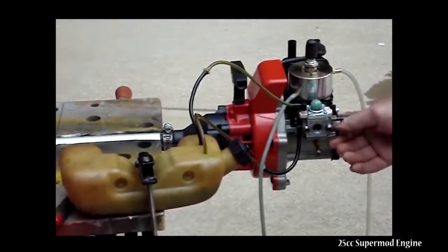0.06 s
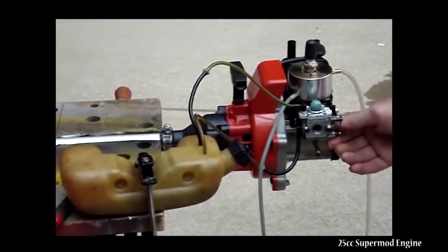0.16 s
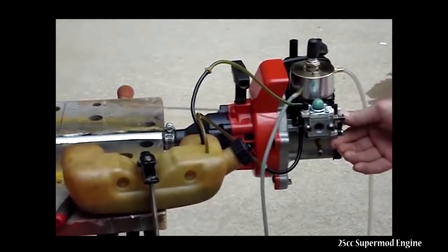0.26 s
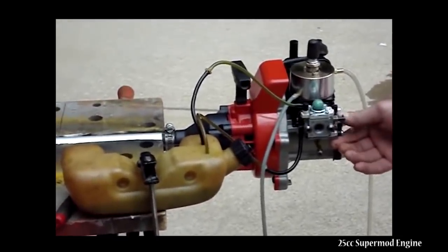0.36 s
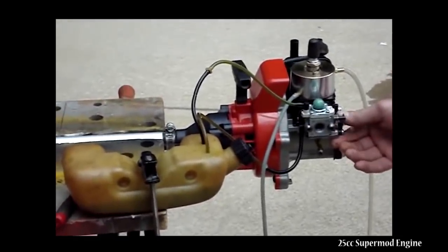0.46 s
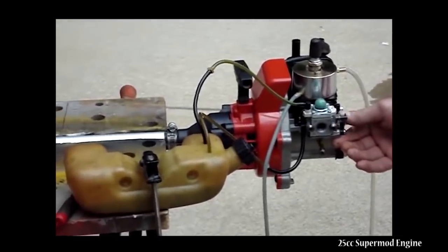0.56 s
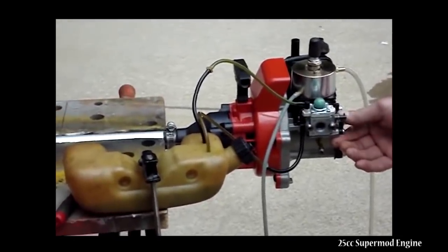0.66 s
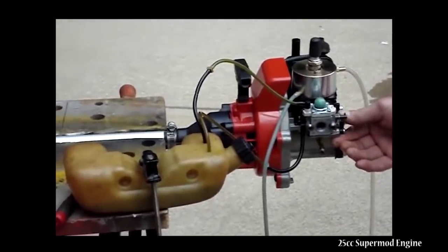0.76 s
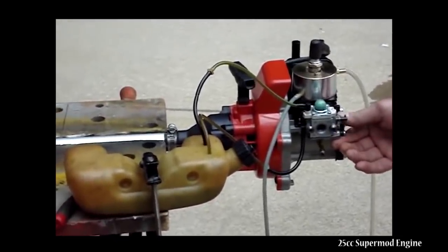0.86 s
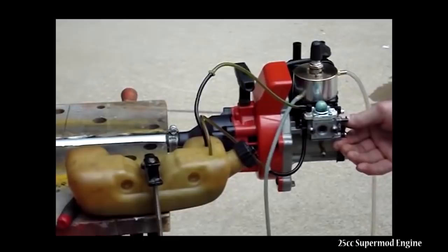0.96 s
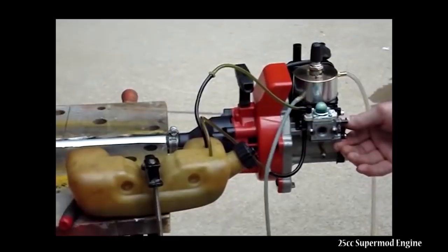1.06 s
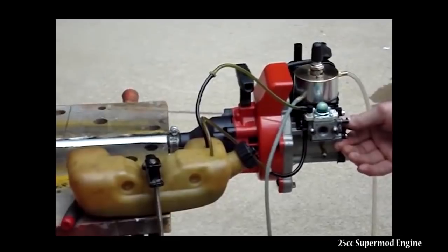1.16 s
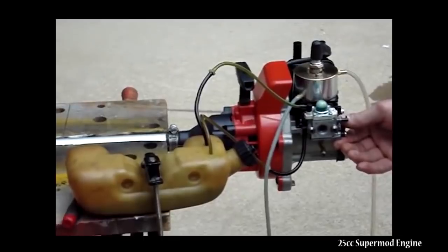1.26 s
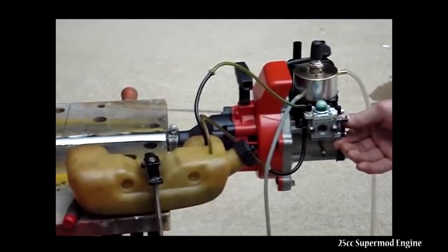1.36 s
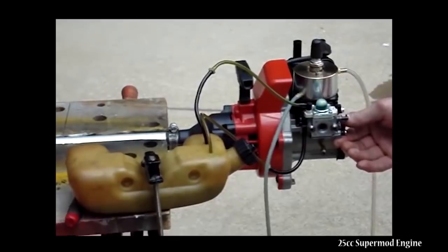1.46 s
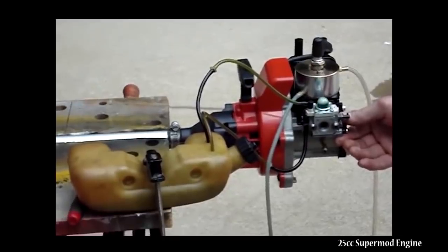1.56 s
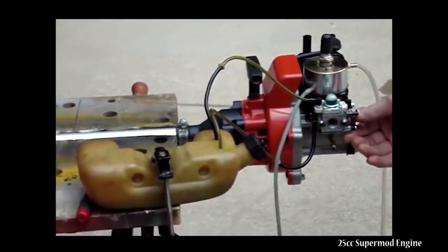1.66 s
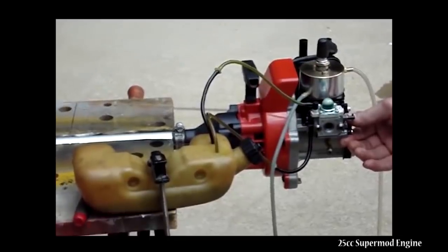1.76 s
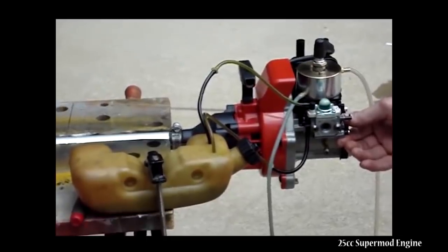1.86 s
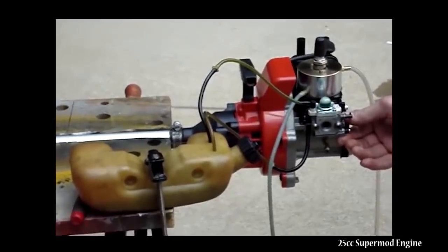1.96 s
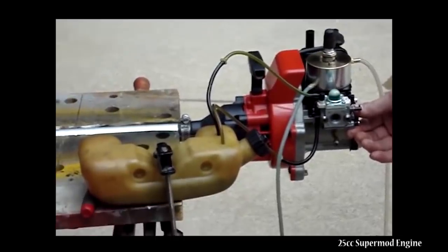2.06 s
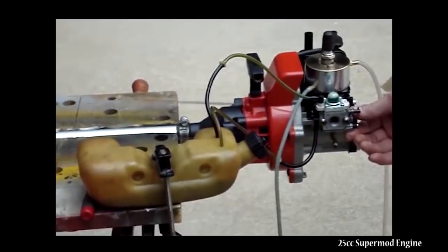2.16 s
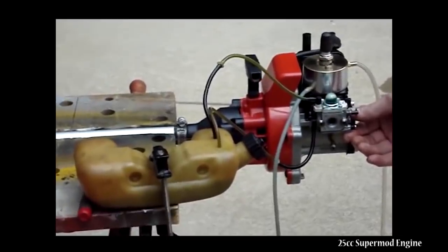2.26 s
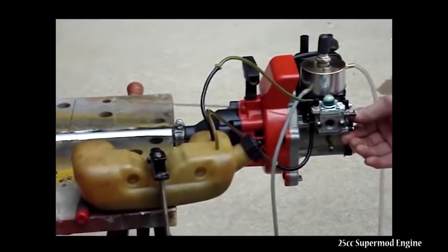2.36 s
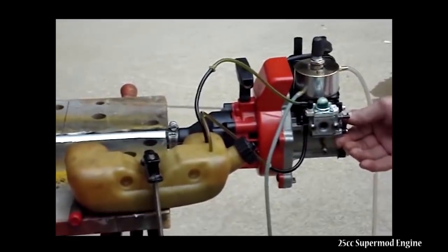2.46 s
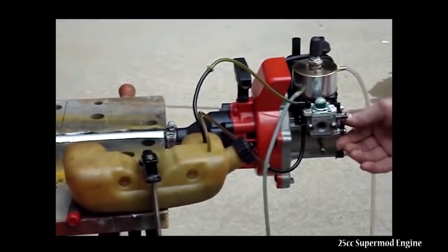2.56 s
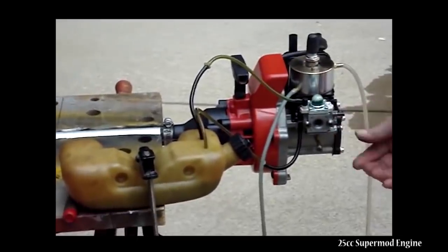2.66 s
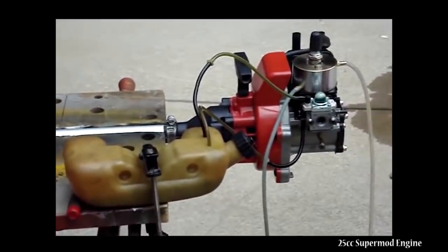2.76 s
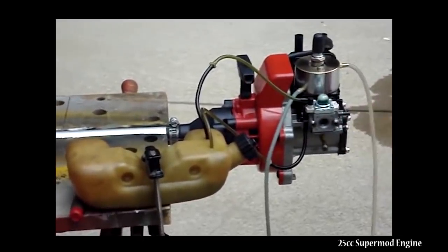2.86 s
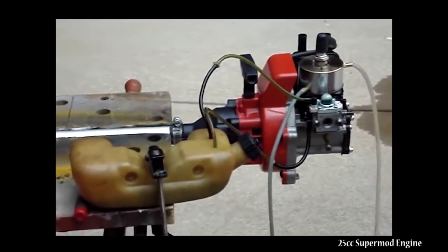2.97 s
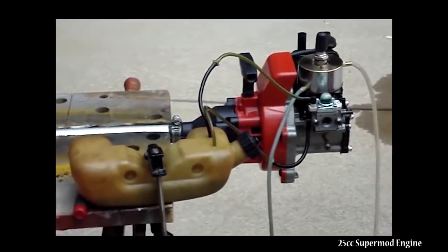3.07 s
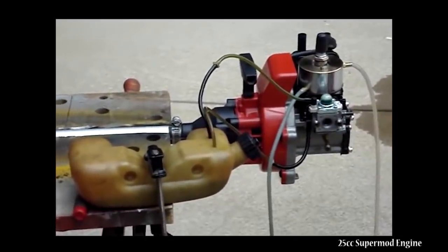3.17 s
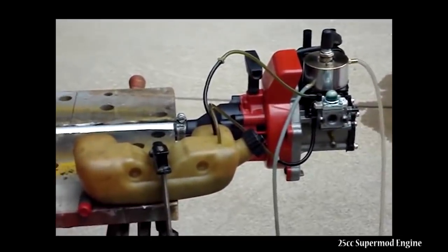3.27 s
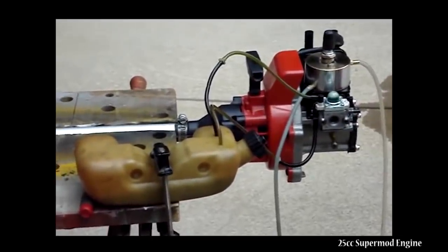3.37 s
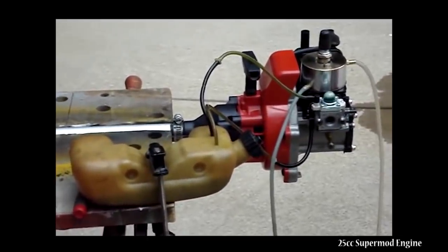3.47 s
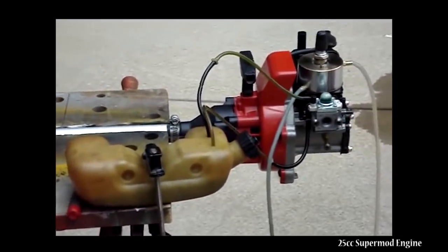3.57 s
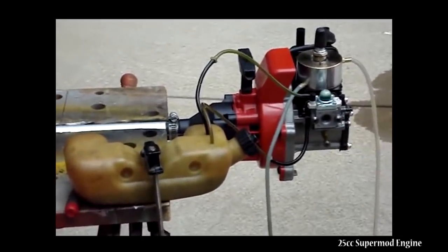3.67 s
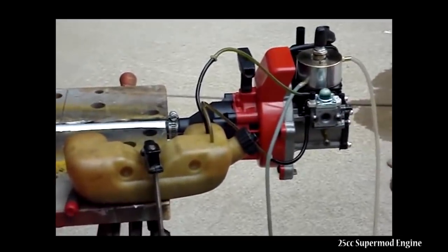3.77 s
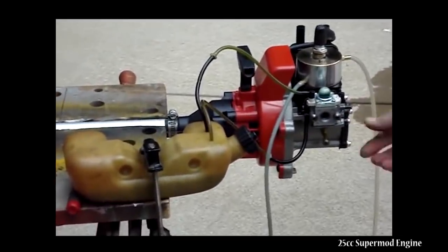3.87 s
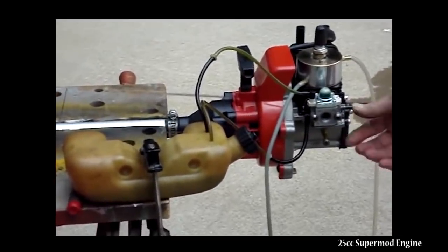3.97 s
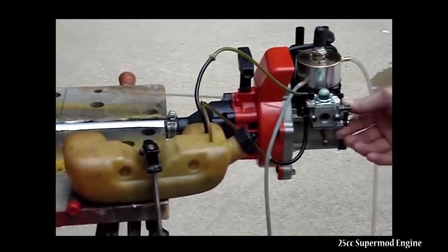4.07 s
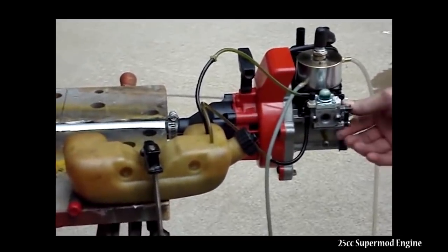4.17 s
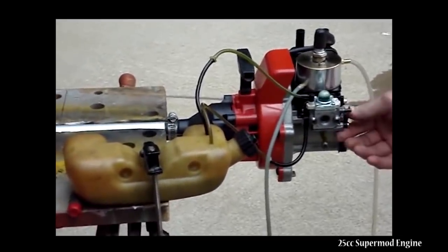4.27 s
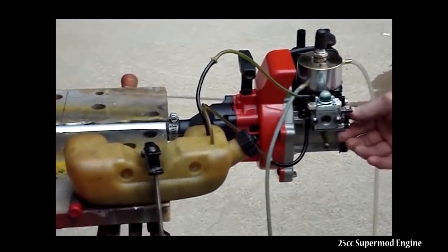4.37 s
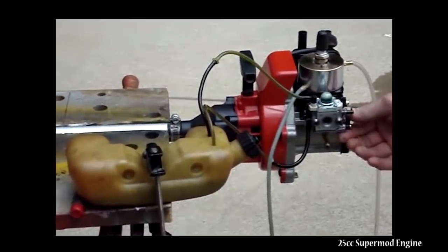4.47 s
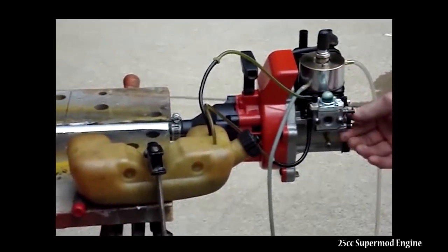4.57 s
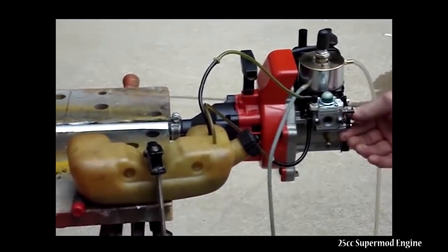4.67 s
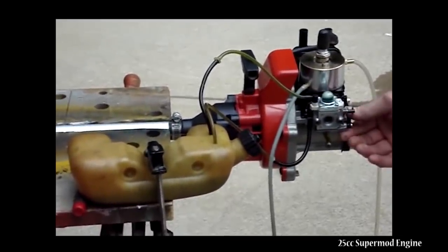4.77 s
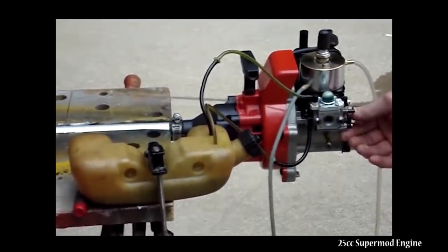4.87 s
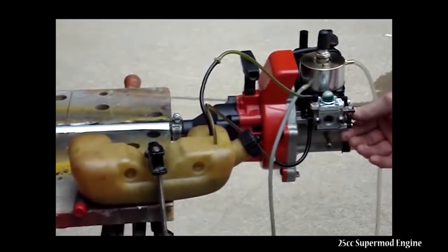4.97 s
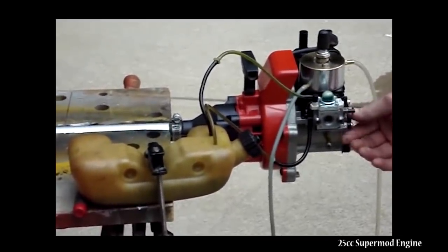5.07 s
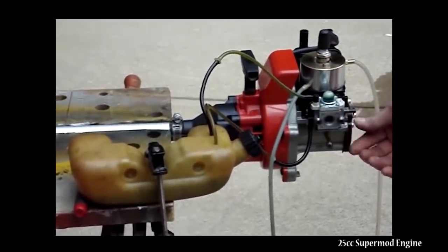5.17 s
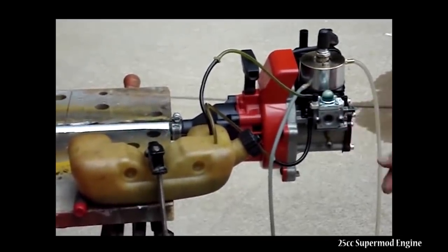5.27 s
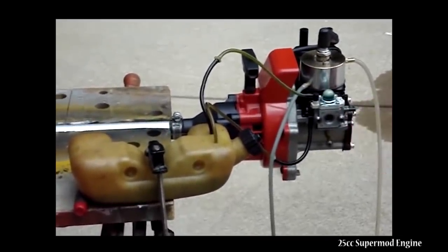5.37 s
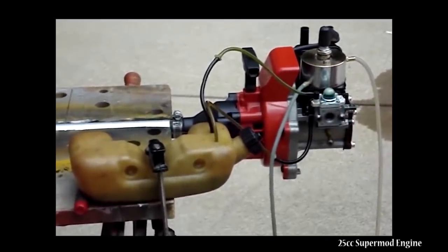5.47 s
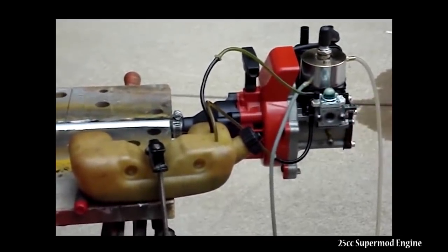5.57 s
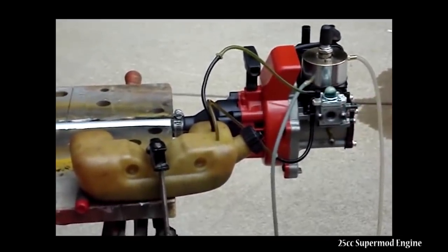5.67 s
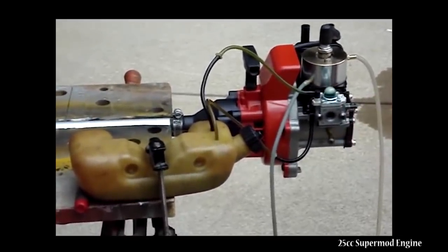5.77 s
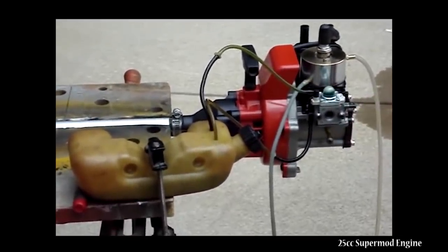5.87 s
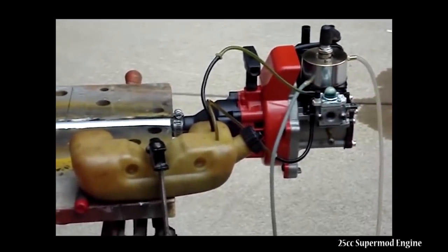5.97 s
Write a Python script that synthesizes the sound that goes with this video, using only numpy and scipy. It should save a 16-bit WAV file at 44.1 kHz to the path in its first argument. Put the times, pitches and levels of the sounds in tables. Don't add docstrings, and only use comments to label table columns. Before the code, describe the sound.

Screaming little petrol engine snaps shut, coasts down through singing whines and buzzes, then idles with sharp irregular cracks and metallic rattling.

```python
import sys
import numpy as np
from scipy import signal
from scipy.io import wavfile
from scipy.ndimage import uniform_filter1d

SR = 44100
rng = np.random.default_rng(int(sys.argv[2]) if len(sys.argv) > 2 else 0)


def boost(x):
    u = np.asarray(x, float) / 20
    return 10 ** u


def materialize(psi):
    bounded = np.clip(np.atleast_2d(psi).T, -1, 1)
    quanta = np.round(bounded * 32767).astype(np.int16)
    wavfile.write(sys.argv[1], SR, quanta)


N = 265923
BASS_HZ = 170
SKIP_FROM_S, SKIP_UNTIL_S = .1357, .2961


def ring(x, modes):
    total = 0
    for k, (hz, width_hz, db) in enumerate(modes):
        b, a = signal.iirpeak(hz, hz / width_hz, fs=SR)
        total = total + (-1) ** k * boost(db) * signal.lfilter(b, a, x)
    return total


def clicks(at, size):
    whole = np.clip(at, 0, N - 2).astype(int)
    part = at - whole
    return np.bincount(whole, size * (1 - part), N) + np.bincount(whole + 1, size * part, N)


def held(x, db, span_s=0.11):
    return x * boost(db) / np.sqrt(uniform_filter1d(x ** 2, int(span_s * SR)) + 1e-12)


def struck(at, db, modes, burst_s, rough):
    push = np.exp(-np.arange(int(8 * burst_s * SR)) / (burst_s * SR))
    grain = 1 - rough + rough * rng.standard_normal(N)
    trials = push * grain[:12 * len(push)].reshape(12, -1)
    typical = np.abs(ring(np.pad(trials, ((0, 0), (0, 400))), modes)).max(axis=1).mean()
    blows = signal.fftconvolve(clicks(at, boost(db)), push)[:N]
    return ring(blows * grain, modes) / typical


# (time_s, turns_per_s)
SPEED = [(0, 180), (.13, 210.9), (.2, 218), (.28, 221.1), (.33, 217.4), (.5, 195.5), (.9, 146.4),
         (1.1, 121.6), (1.3, 103.5), (1.5, 87.7), (1.7, 75.4), (1.9, 62.5), (2.45, 51), (3.0, 37),
         (3.9, 32), (4.6, 36), (5.1, 54), (6.03, 47)]


def speed(size=N):
    return np.interp(np.arange(size) / SR, *np.transpose(SPEED))


def crank():
    turns = np.cumsum(speed()) / SR
    marks = (SR * np.array([SKIP_FROM_S, SKIP_UNTIL_S] + [row[0] for row in FIRINGS])).astype(int)
    whole = np.cumsum(np.round(np.diff(turns[marks], prepend=0)))
    return turns + np.interp(np.arange(N), marks, whole - turns[marks])


def slowness(turns):
    return np.clip(uniform_filter1d(35 / SR / np.gradient(turns), 2000), 0, 1)


def throttle(size=N):
    shut_s = .3
    return np.interp(np.arange(size) / SR, [shut_s - .01, shut_s + .03], [1, 0])


# (time_s, level_db)
LEVEL = [(0, -36.5), (0.119, -37.5), (.27, -42), (.5, -38), (.69, -35.5), (.86, -33), (1.01, -29),
         (1.29, -29), (1.529, -27.5), (1.71, -28), (2.1, -33.5), (2.5, -42.5), (3.73, -45.5), (4.2, -42.5),
         (4.52, -44), (5.0, -40), (5.51, -44.5), (6.03, -44.5)]


def engine_db():
    return np.interp(np.arange(N) / SR, *np.transpose(LEVEL))


# (mode_hz, width_hz, level_db)
MUFFLER = [(214.6, 95, -1), (295.4, 44.2, 5.5), (351.7, 48.5, 2), (384.4, 35.4, 1), (514, 107, -18)]
# (mode_hz, width_hz, level_db)
INTAKE = [(529, 140, -4), (788, 123, 4.5), (1007, 212, 1), (1165, 95, 3.5), (1300, 170, -4)]


def pumping(turns, muffler_db, intake_db):
    hollow_hz, hollow_width_hz = 702, 66
    sigh_s = 0.0033
    count = np.arange(np.ceil(turns[0]), turns[-1])
    place = lambda angle: np.interp(angle, turns, np.arange(N))
    slow = slowness(turns)
    each = slow[place(count).astype(int)]
    chance = rng.standard_normal((len(count), 4)).T
    first = clicks(place(count - .03 + .01 * each * chance[0]), boost(1.4 * each * chance[1]))
    second_turn = count + .45 + 0.012 * each ** 2 * chance[3]
    second = clicks(place(second_turn), boost(1.6 * each * chance[2]))
    flutter = rng.standard_normal(N) * np.exp(-(turns % 1) / 5.8)
    push = np.hanning(int(sigh_s * SR))
    sigh = signal.fftconvolve(second, push / push.sum())[:N]
    breath = boost(-41 + 8 * slow ** 3) * flutter
    muffler = ring(first + boost(-8.5 + 9.6 * slow ** 4) * sigh + breath, MUFFLER)
    intake = ring(first + boost(-10) * second + boost(-37 + 25 * slow) * flutter, INTAKE)
    intake = signal.lfilter(*signal.iirnotch(hollow_hz, hollow_hz / hollow_width_hz, fs=SR), intake)
    merged_db = np.interp(slow, [.4, .6], [-13, 0])
    return held(muffler, muffler_db + merged_db) + held(intake, intake_db)


# (tone_hz, level_db)
TONE_COLOUR = [(100, -23), (150, -24), (200, -6.5), (250, -1.5), (310, 3.5), (420, -5.5), (560, -12.5),
               (1000, -35.5)]
ORDER_DB = [-6.5, -1, -7.5, -2, 3.5, -3, 4.5, 0.5, -12, -4.5, -8.5]
OPEN_ORDER_DB = [6.5, -1.5, 8, 24, -35, -19, -20, -9, -14, -7, -9]
ORDER_TILT_DB = [0, 0.5, 6.5, 3.5, 5, -2, -7.5, -4, -1, -0.5, -7]
MERGE_HZ = [34, 51.5, 68.2]
APART_DB = [-25.5, -16]


def tones(turns):
    wobble_turns = 0.03
    hz, colour_db = np.transpose(TONE_COLOUR)
    steps = np.repeat(rng.standard_normal((len(ORDER_DB), N // 900 + 1)), 900, axis=1)
    waver = uniform_filter1d(steps, 900)[:, :N]
    rate, opened = speed(), throttle()
    common_db = engine_db() + np.interp(rate, MERGE_HZ, APART_DB + [0])
    octaves = np.log2(rate / 90)
    turns = turns + wobble_turns * slowness(turns) * waver[-1]
    total = 0
    for k in range(len(ORDER_DB)):
        multiple = k + 1
        level_db = common_db + ORDER_DB[k] + ORDER_TILT_DB[k] * octaves + OPEN_ORDER_DB[k] * opened
        level_db = level_db + np.interp(np.log(multiple * rate), np.log(hz), colour_db) + 2.6 * waver[k]
        total = total + boost(level_db) * np.sqrt(2) * np.sin(2 * np.pi * multiple * turns + multiple ** 2)
    return total


# (mode_hz, width_hz, level_db)
BELL = [(980, 350, -12), (1110, 197, 18), (1330, 580, 11.5), (3495, 68, 12.5)]
# (mode_hz, width_hz, level_db)
WHISTLE = [(3480, 110, 0)]
# (mode_hz, width_hz, level_db)
THROAT = [(300, 53, -7.5), (1050, 830, -4), (2480, 1300, -41), (4600, 380, -2.5), (5540, 260, 8),
          (6200, 95, 8.5), (7170, 630, -0.5), (9830, 510, -3)]
SKIP_TURNS = [2] * 8 + [3] + [2] * 3 + [3, 3, 4]


def roar(turns):
    full_until_s, full_db, skip_db, rasp_db = .129, -14, -14, -25
    fired = np.round(turns[int(SKIP_FROM_S * SR)]) + np.cumsum([0] + SKIP_TURNS)
    sucks = np.interp(np.arange(np.ceil(turns[0]), fired[-1] + 1), turns, np.arange(N))
    full = sucks[sucks < full_until_s * SR]
    bellow_db = np.interp(sucks / SR, [0, .1, .26, .31], [-23.5, -21.5, -25.5, -32])
    bellow = struck(sucks, bellow_db, BELL, burst_s=.0001, rough=0.26)
    whistle = struck(full, np.full(len(full), -26.), WHISTLE, burst_s=.0001, rough=0.23)
    crack_db = np.r_[np.full(len(full), full_db), np.full(len(fired), skip_db)]
    crack_db = crack_db + 0.97 * rng.standard_normal(len(crack_db))
    rasp = struck(full, np.full(len(full), rasp_db), THROAT[3:], burst_s=0.0016, rough=0.67)
    crack_at = np.r_[full, np.interp(fired, turns, np.arange(N))]
    cracks = struck(crack_at, crack_db + 3, THROAT, burst_s=.00006, rough=.2)
    return bellow + whistle + rasp + cracks


# (start_s, crack_db, thump_re_crack_db, can_re_crack_db)
SETTLING = [(1.6773, -8.5, -51.5, -19), (1.76, -6.5, -47, -15.5), (1.848, -7, -63, -37),
            (1.897, -19, -43, -28), (1.913, -7.5, -52, -33), (1.9446, -7.5, -48.5, -47),
            (1.996, -11, -52, -29), (2.0275, -8, -47, -18), (2.1122, -8, -54, -26),
            (2.1641, -7.5, -49.5, -24), (2.2349, -10, -52, -25), (2.3061, -9.5, -50, -23),
            (2.421, -8.5, -54.5, -24), (2.499, -17, -54.5, -29), (2.5407, -11, -51.5, -32),
            (2.6486, -8, -66.5, -35), (2.7137, -14.5, -60, -29), (2.7602, -12.5, -51, -33),
            (2.829, -12.5, -53, -23.5), (2.9026, -17.5, -56, -22), (2.9548, -16, -52, -39)]
# (start_s, crack_db, thump_re_crack_db, can_re_crack_db)
SLOW_IDLE = [(3.038, -10, -68, -23.5), (3.1193, -10.5, -54.5, -36), (3.2, -11.5, -58, -28),
             (3.281, -9, -55, -31), (3.362, -8.5, -60, -24), (3.4403, -17, -45, -20.5),
             (3.52, -13.5, -53, -29.5), (3.636, -12.5, -62, -29), (3.721, -12, -52.5, -37),
             (3.8102, -14, -62, -30), (3.8693, -21, -63, -24), (3.934, -12, -58, -27),
             (4.0255, -13.5, -53, -24), (4.1147, -15, -59.5, -17.5), (4.2011, -10.5, -54, -37),
             (4.2846, -13.5, -53, -43), (4.372, -13.5, -55, -28), (4.4569, -10.5, -56, -37),
             (4.5398, -10, -58, -27.5), (4.622, -12, -61, -30), (4.6998, -12.5, -53, -35)]
# (start_s, crack_db, thump_re_crack_db, can_re_crack_db)
FAST_IDLE = [(4.7742, -13.5, -51, -25), (4.82, -16, -56, -27), (4.8682, -9, -56, -58),
             (4.9335, -12.5, -51, -23), (4.9947, -9.5, -49.5, -34), (5.0535, -10, -52.5, -40),
             (5.1083, -15.5, -48, -19), (5.2009, -9, -54, -44), (5.2782, -13.5, -50.5, -25),
             (5.3393, -11.5, -52, -26), (5.397, -15.5, -49.5, -17.5), (5.458, -14, -53, -32),
             (5.5167, -14, -56, -34), (5.6018, -13.5, -49, -34), (5.6844, -9, -65, -32),
             (5.767, -11, -54.5, -22), (5.8255, -14, -51, -26), (5.8887, -14, -57, -35),
             (5.934, -12, -57, -22.5)]
FIRINGS = SETTLING + SLOW_IDLE + FAST_IDLE
# (mode_hz, width_hz, level_db)
CRACK = [(770, 210, -11), (1980, 1500, -38), (3680, 2500, -15), (5100, 3300, -12), (5460, 140, -1),
         (6300, 260, -10), (7740, 360, -13.5), (8800, 290, -9), (9730, 380, -11)]
# (mode_hz, width_hz, level_db)
SNAP = [(1520, 1100, -13.5), (4400, 2050, -0.5), (6170, 1170, -1), (9210, 1800, -1.5)]
# (mode_hz, width_hz, level_db)
CAN = [(2934, 22, 0)]
# (mode_hz, width_hz, level_db)
PIPE = [(4397, 170, 0), (4690, 370, -8.5)]
# (start_s, level_db)
PIPE_RINGS = [(1.6773, -24), (1.7042, -30), (1.7596, -18), (1.787, -29), (1.8484, -29), (1.9447, -28),
              (1.9726, -24), (2.029, -29), (2.0549, -34), (2.1123, -21), (2.139, -29), (2.1633, -19),
              (2.1921, -33), (2.2155, -28), (2.2355, -29), (2.2629, -33), (2.2894, -33), (2.306, -29),
              (2.403, -33), (2.4211, -14), (2.447, -27), (2.498, -22), (2.5205, -36), (2.5403, -31),
              (2.6032, -35), (2.6502, -19.5), (2.6755, -34), (2.7135, -23), (2.7374, -34), (2.7603, -31),
              (2.829, -22), (2.8556, -32), (2.903, -29), (2.9269, -40), (2.9554, -26), (2.9818, -38),
              (3.0373, -19.5), (3.0646, -45), (3.0911, -41), (3.119, -33), (3.1449, -39), (3.2008, -19),
              (3.2253, -39), (3.2811, -30), (3.3086, -41), (3.3624, -21), (3.3899, -37), (3.4403, -31),
              (3.4677, -38), (3.5197, -34), (3.6079, -38), (3.6361, -28), (3.7216, -39), (3.7486, -38),
              (3.8099, -35),
              (3.8698, -42), (3.9341, -36), (3.9636, -40), (3.9925, -39), (4.0259, -36), (4.1157, -31),
              (4.1427, -46), (4.201, -18), (4.2863, -24), (4.3128, -40), (4.3721, -27), (4.3981, -39),
              (4.4565, -22), (4.4829, -38), (4.5403, -32), (4.5677, -39), (4.6231, -35), (4.7019, -31),
              (4.7757, -28), (4.8022, -26), (4.8211, -26), (4.8451, -26), (4.869, -15), (4.895, -32),
              (4.9344, -25), (4.9603, -37), (4.9952, -27), (5.0222, -38), (5.0536, -17), (5.08, -36),
              (5.1085, -15), (5.1359, -39), (5.2023, -14), (5.2292, -29), (5.2591, -38), (5.2786, -32),
              (5.3389, -21), (5.3664, -29), (5.3983, -29), (5.4253, -39), (5.4582, -17.5), (5.4851, -25),
              (5.518, -25), (5.5594, -39), (5.6023, -28), (5.6847, -24), (5.7665, -34), (5.8268, -26),
              (5.8533, -44), (5.8892, -32), (5.9116, -42), (5.9341, -20), (5.961, -36), (5.9915, -46),
              (6.0069, -29)]
# (mode_hz, width_hz, level_db)
BARK = [(318.7, 47, 0)]


def pops(turns):
    idle_db, bark_follows = -44, 0.29
    thump_re_engine_db, bark_re_engine_db, bark_per_thump = -24.5, 12, -0.81
    tail_db, tail_s, colour_scatter_db = -16.5, 0.005, 2.5
    snap_db, snap_lag_s = -7, 0.001207
    wall_s, wall_db = .027, -18
    s, db, thump_db, can_db = np.transpose(FIRINGS)
    at = s * SR
    level_db = engine_db()[at.astype(int)]
    excess_db = np.clip(db + thump_db - level_db - thump_re_engine_db, -8, 12)
    bark_db = idle_db + bark_follows * (level_db - idle_db) + bark_re_engine_db + bark_per_thump * excess_db
    ring_s, ring_db = np.transpose(PIPE_RINGS)
    lean_db = colour_scatter_db * rng.standard_normal((len(s), 2)).T
    body = struck(at, db - 10, CRACK[:5], burst_s=0.0014, rough=0.8)
    edge = struck(at, db - 10.5 + lean_db[0], CRACK[5:], burst_s=0.0027, rough=0.75)
    tail = struck(at, db + tail_db + lean_db[1], FINS[:5], burst_s=tail_s, rough=0.87)
    snap = struck((s + snap_lag_s) * SR, db + snap_db, SNAP, burst_s=0.0001, rough=0.43)
    can = struck(at, db + can_db + 5, CAN, burst_s=.00006, rough=.1)
    pipe = struck(ring_s * SR, ring_db - 3, PIPE, burst_s=0.00034, rough=0.46)
    bark = struck(at, bark_db + 4, BARK, burst_s=0.00013, rough=0.07)
    knock_db = db + wall_db + 1.8 * rng.standard_normal(len(s))
    knock = struck((s + wall_s) * SR, knock_db, FINS, burst_s=0.0033, rough=0.99)
    direct = body + edge + tail + snap + can + pipe + bark + knock
    dull = signal.lfilter(*signal.butter(2, 6000, fs=SR), direct)
    heard = direct
    for echo_s, echo_db in ((0.0033, -5.0), (0.0049, -11.5), (.011, -10.0)):
        heard = heard + boost(echo_db) * np.roll(dull, int(echo_s * SR))
    return heard


# (delay_ms, level_db)
SLAPS = [
    (0.201, -8),
    (0.909, -8),
    (2.9, -10),
    (4.401, -9.5),
]
# (mode_hz, width_hz, level_db)
CASE = [(1420, 190, -5), (1776, 82, -0.5), (1937, 133, 1), (2176, 670, -6), (2830, 160, 0),
        (3030, 145, -3.5), (3600, 570, -6.5)]
# (mode_hz, width_hz, level_db)
FINS = [(4235, 970, -1), (4453, 170, -2.5), (4394, 235, -5), (5820, 860, -3.5), (6300, 930, -5),
        (8020, 950, -7), (9050, 690, -8.5)]
# (mode_hz, width_hz, level_db)
AIR = [(8800, 4200, 0)]


def rattle(turns, rattle_db, hiss_db):
    air_db = -62.5
    count = np.arange(np.ceil(turns[0]), turns[-1])
    slow = slowness(turns)
    slap = 0
    for delay_ms, db in SLAPS:
        at = np.minimum(np.interp(count, turns, np.arange(N)) + delay_ms * SR / 1000, N - 2)
        chance = np.clip(rng.standard_normal(len(count)), -2, 1.3)
        slap = slap + clicks(at, boost(db + 16.5 * slow[at.astype(int)] * chance))
    swell = 1.6 + np.exp(-(turns % 1) / 0.5)
    case = ring(slap + boost(-39 + 30 * slow) * swell * rng.standard_normal(N), CASE)
    fins = ring(slap + boost(-27 + 15 * slow) * swell * rng.standard_normal(N), FINS)
    air = held(ring(swell * rng.standard_normal(N), AIR), air_db + 12 * slow)
    return held(case, rattle_db) + held(fins, hiss_db) + air


def near(at_hz, within_hz, size=N):
    return -6 * ((speed(size) - at_hz) / within_hz) ** 2 - 25 * throttle(size)


# (crank_multiple, level_re_engine_db, at_turns_per_s, within_turns_per_s)
WHINE = [(6, 3, 178.3, 20.3), (7, 2, 147.3, 8), (6, 3, 146, 3.3), (8, 0, 148.5, 9.2),
         (10, -1.5, 178.6, 7.9), (14, -1.5, 221, 14), (15, -3, 185, 10), (17, -2, 164, 10),
         (19, -3, 144, 4.6), (13, 0, 142, 5.5), (16, -9, 194, 17), (21, -2.5, 197, 14), (23, -8.5, 155, 13),
         (20, -4, 157, 8.8), (8, -14, 95, 4.3), (4, 3.5, 82, 17.6), (9, -12.5, 112, 8.3), (7, -12.5, 86, 9),
         (14, -5, 182, 26), (18, -5, 170, 22), (28, -6, 150, 8.2), (12, -11, 141, 8.5)]
# (mode_hz, width_hz, level_re_engine_db, at_turns_per_s, within_turns_per_s)
BUZZ = [(1780, 960, 1, 131.7, 17), (4440, 910, -4, 95, 9.4), (2800, 450, -15, 102, 8.5),
        (3080, 400, -15, 200, 12)]


def whine(turns):
    size = 2 * SR
    steps = np.repeat(rng.standard_normal((len(WHINE), N // 1800 + 1)), 1800, axis=1)
    waver = uniform_filter1d(steps, 1800)[:, :size]
    base_db = engine_db()
    sing = 0
    for k, (multiple, db, at_hz, within_hz) in enumerate(WHINE):
        level_db = base_db[:size] + db + near(at_hz, within_hz, size) + 3.5 * waver[k]
        tone = np.sin(2 * np.pi * np.round(multiple) * turns[:size] + k)
        sing = sing + boost(level_db) * np.sqrt(2) * tone
    shake = rng.standard_normal(N) * (0.71 + np.exp(-(turns % 1) / 0.28))
    buzz = 0
    for hz, width_hz, db, at_hz, within_hz in BUZZ:
        part = ring(shake, [(hz, width_hz, 0)])
        buzz = buzz + held(part, base_db + db + near(at_hz, within_hz), span_s=.3)
    return np.pad(sing, (0, N - size)) + buzz


def thumps(rumble_db):
    spike_s, spike_db, spike_lag_s = 0.0011, 42.5, 0.0012
    s, db, thump_db = np.transpose(FIRINGS)[:3]
    blasts = clicks((s + spike_lag_s) * SR, -boost(db + thump_db))
    shifts = signal.fftconvolve(blasts, boost(21.0) * np.hanning(int(0.01 * SR)))[:N]
    spikes = signal.fftconvolve(blasts, boost(spike_db) * np.hanning(int(spike_s * SR)))[:N]
    rumble = ring(rng.standard_normal(N), [(24, 13, -3), (140, 150, -6.5)])
    rumble = held(rumble, rumble_db, span_s=.9)
    return signal.lfilter(*signal.butter(1, 14, "high", fs=SR), shifts + spikes + rumble)


# (start_s, inward_spike_db, excess_over_threshold_db)
OVERLOADS = [(1.6785, -9, 8), (1.7615, -6, 8.5), (1.9462, -10, 7), (2.029, -13, 5), (2.1135, -12, 3.5),
             (2.1655, -16, 3), (2.2365, -14, 2.5), (2.3075, -17, 2)]


def jolts():
    jolt_s = 0.00019
    s, spike_db, _ = np.transpose(OVERLOADS)
    hits = clicks((s - jolt_s) * SR, -boost(spike_db))
    spikes = signal.fftconvolve(hits, np.hanning(int(jolt_s * SR)))[:N]
    return signal.lfilter(*signal.butter(2, BASS_HZ, "high", fs=SR), spikes)


# (dip_share, release_s)
DUCK = [(0.8, .012), (0.55, .12)]


def limiter():
    s, _, excess_db = np.transpose(OVERLOADS)
    trips = clicks(s * SR, excess_db)
    dip_db = 0
    for share, release_s in DUCK:
        dip_db = dip_db + share * signal.lfilter([1], [1, -np.exp(-1 / (release_s * SR))], trips)
    return boost(-dip_db)


def dropouts():
    grid_s, grid_lag_s, blast_s = .036, .008, .011
    before_hz, after_hz, edge_spread = 3970, 5660, 0.15
    before_db, after_db, noticed_db = -31.5, -43, 15
    s, db = np.transpose(FIRINGS)[:2]
    stands_out = db > engine_db()[(s * SR).astype(int)] + noticed_db
    s = np.r_[SKIP_UNTIL_S, s[stands_out]]
    start_s = np.floor((s - grid_lag_s) / grid_s) * grid_s + grid_lag_s
    chance = rng.standard_normal((len(s), 3)).T
    before_edge_hz, after_edge_hz = np.outer([before_hz, after_hz], np.ones(len(s))) * np.exp(
        edge_spread * chance[:2])
    before = np.c_[start_s, s - start_s - .001, before_edge_hz, np.full(len(s), before_db)]
    after_lost_db = np.minimum(after_db + 8 * chance[2], -6)
    after = np.c_[s + blast_s, start_s + grid_s - s - blast_s, after_edge_hz, after_lost_db]
    rows = np.r_[before, after[1:]]
    return rows[rows[:, 1] > .004]


def patchy_treble(x):
    early_top_hz, early_until_s = 10020, 1.65
    patchy_from_s, patchy_above_hz, patchy_share, patchy_db = 1.45, 4800, .2, -12
    hz, s, spectrum = signal.stft(x, SR, nperseg=256, noverlap=192)
    keep = np.ones(spectrum.shape[-2:])
    keep[np.outer(hz > early_top_hz, s < early_until_s)] = boost(-35)
    luck = np.kron(rng.random((len(hz) // 4 + 1, len(s) // 4 + 1)), np.ones((4, 4)))
    luck = luck[:len(hz), :len(s)]
    patchy_time = (s > patchy_from_s) | (np.abs(s - .27) < .07)
    keep[np.outer(hz > patchy_above_hz, patchy_time) & (luck < patchy_share)] = boost(patchy_db)
    for start_s, length_s, edge_hz, lost_db in dropouts():
        inside = np.outer(hz > edge_hz, (s > start_s - .001) & (s < start_s + length_s + .001))
        survive = np.outer(np.exp(-np.abs(hz - edge_hz) / 3500), .8 - .6 * (s - start_s) / length_s)
        keep[inside & (luck > survive)] = boost(lost_db)
    return signal.istft(spectrum * keep, SR, nperseg=256, noverlap=192)[1][:, :N]


# (turns_per_s, muffler_db, rattle_db, hiss_db, rumble_db)
BALANCE_BY_SPEED = [(30.7, 8.5, 1.5, -5, -16), (60.8, 7, -6.5, -1, -25.5), (78.5, -15, -3.5, -5.5, -27),
                    (102, -2, -2, -9.5, -25), (150, -27, 1.5, -1, -40), (232, 2, 5.5, -1, -27)]


def scene():
    pull_hiss_db, pull_rattle_db, open_rumble_db = 5, -1, 14
    turns = crank()
    rate, opened, level_db = speed(), throttle(), engine_db()
    hz, *columns = np.transpose(BALANCE_BY_SPEED)
    muffler_db, rattle_db, hiss_db, rumble_db = (level_db + np.interp(rate, hz, c) for c in columns)
    pull = opened * (rate.max() - rate) / 40
    engine = pumping(turns, muffler_db, level_db) + roar(turns) + pops(turns)
    engine = engine + rattle(turns, rattle_db + pull_rattle_db * opened, hiss_db + pull_hiss_db * pull)
    bass_cut = signal.butter(4, BASS_HZ, "high", fs=SR, output="sos")
    heard = signal.sosfilt(bass_cut, engine) + tones(turns) + whine(turns)
    heard = heard * limiter() + jolts() + thumps(rumble_db + open_rumble_db * opened)
    return np.array([heard, heard])


def roll_off(x):
    return signal.sosfilt(signal.butter(12, 11380, fs=SR, output="sos"), x)


def record(dry):
    top_cut = signal.ellip(10, .3, 60, 10280, fs=SR, output="sos")
    mix = patchy_treble(signal.sosfilt(top_cut, dry))
    return roll_off(mix)


dry = scene()
out = record(dry)
materialize(out)
```